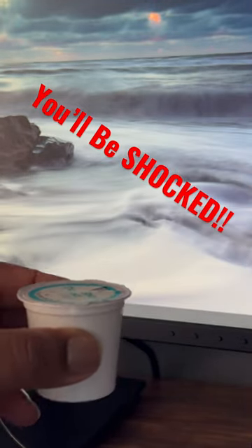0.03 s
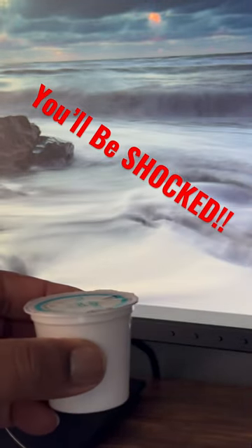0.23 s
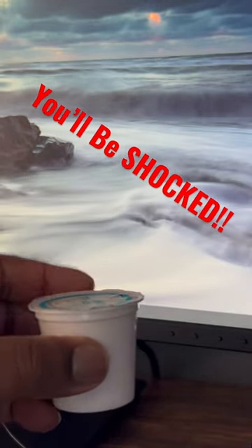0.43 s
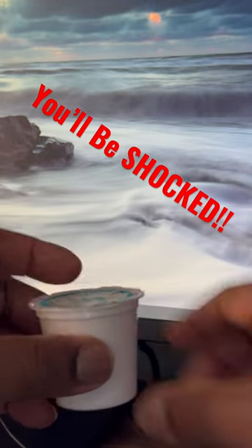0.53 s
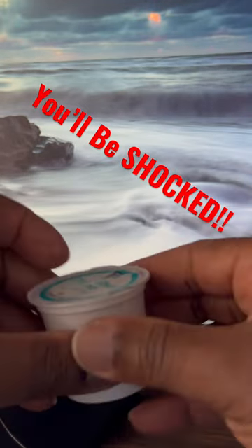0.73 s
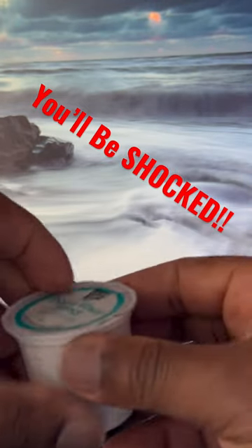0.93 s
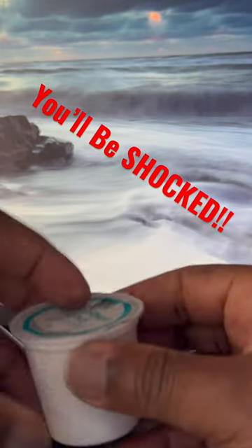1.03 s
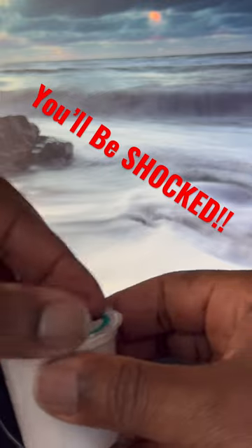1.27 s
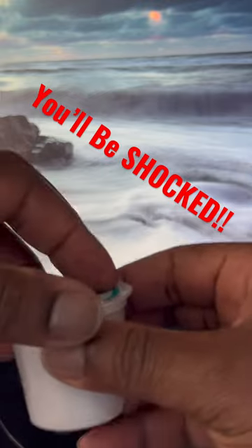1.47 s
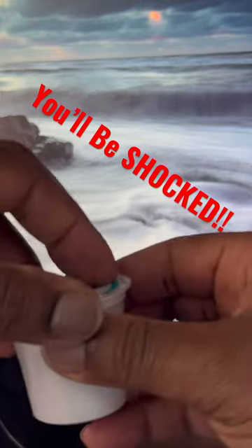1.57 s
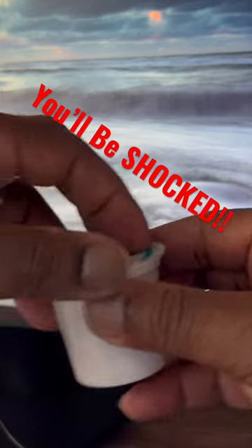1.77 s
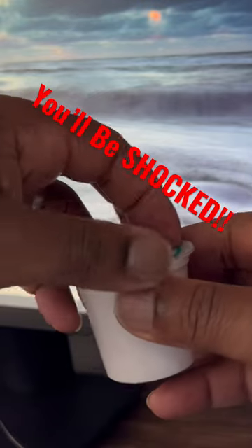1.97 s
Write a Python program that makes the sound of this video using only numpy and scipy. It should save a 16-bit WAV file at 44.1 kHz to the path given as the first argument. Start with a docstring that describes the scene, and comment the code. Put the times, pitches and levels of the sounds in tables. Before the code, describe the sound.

A small plastic pod clatters onto a desk, then fingers faintly pick at its lid.

```python
"""At a desk in a small room, close up: a plastic coffee pod is knocked down, bounces and rocks to rest.
Each hit layers a desk thud, a hollow clack and a plastic crack, and sets pod and desk ringing.
Fingers then slide over the empty cup and pick at its foil lid: skin rubs in tiny slips, nails tick
and fingertips bump softly. A low room rumble lies underneath."""
import sys
import numpy as np
from scipy import signal
from scipy.fft import rfft, irfft, next_fast_len
from scipy.io import wavfile
from scipy.ndimage import uniform_filter1d

SR = 44100
rng = np.random.default_rng(int(sys.argv[2]) if len(sys.argv) > 2 else 0)


def master(y):
    """Save y as 16-bit WAV."""
    cut = np.clip(np.atleast_2d(y).T, -1, 1)
    pcm = np.round(cut * 32767)  # scale
    wavfile.write(sys.argv[1], SR, pcm.astype(np.int16))


N = 88200
T = np.arange(SR * 3 // 4) / SR  # seconds within one event
SHARP_RISE_S, SOFT_RISE_S = .00035, .00081


def amp(db):
    """Decibels to gain."""
    return 10 ** (np.asarray(db) / 20)


def unit(x):
    """Scale to rms 1."""
    return x / np.sqrt(np.mean(x ** 2) + 1e-20)


def along(points, hz):
    """Read a curve of (Hz, value) points on a log axis."""
    f, v = np.transpose(points)
    return np.interp(np.log(hz + 1), np.log(f + 1), v)


def bells(rows, f):
    """Gain of a bell EQ with (Hz, width in Hz, dB) bands."""
    return amp(sum(db / (1 + (2 * (f - hz) / width) ** 2) for hz, width, db in rows))


def causal(gain):
    """The minimum-phase response with this gain."""
    cepstrum = irfft(np.log(gain))
    n = len(cepstrum)
    return np.exp(rfft(np.r_[cepstrum[0], 2 * cepstrum[1:n // 2]], n))


def filtered(x, response):
    """Run x through a frequency response."""
    n = x.shape[-1]
    padded = next_fast_len(n + 8192)
    return irfft(rfft(x, padded) * response(np.fft.rfftfreq(padded, 1 / SR)), padded)[..., :n]


def low_cut(x, hz):
    """A gentle high-pass."""
    return signal.sosfilt(signal.butter(2, hz, "high", fs=SR, output="sos"), x)


def fade(t60, rise):
    """Attack and exponential decay, both in seconds."""
    return np.exp(-np.log(1000) * T / t60) * (1 - np.exp(-T / rise))


def ring(hz, t60, rise):
    """One damped vibration."""
    return np.sin(2 * np.pi * hz * T) * fade(t60, rise)


def add(out, start, sound):
    """Mix a sound in at start seconds."""
    part = out[:, max(round(start * SR), 0):][:, :sound.shape[-1]]
    part += sound[..., :part.shape[1]]


# Base stereo spread of the noise layers. Each row: frequency in Hz, side against mid in dB.
STEREO_WIDTH = [(60, -16), (130, -14), (300, -3), (700, -4), (1300, -6), (2500, -11), (4500, -12),
                (9000, -13), (15000, -12)]


def coloured(pair, spectrum, top_hz=SR, width_db=0, peaks=()):
    """Shape two white noises into mid and side of one sound of equal power, dulled above top_hz."""
    def response(f):
        gain = amp(along(spectrum, f)) * bells(peaks, f) / np.sqrt(1 + (f / top_hz) ** 4)
        width = amp(along(STEREO_WIDTH, f) + width_db)
        power = np.mean(gain ** 2 * (1 + width ** 2))
        return causal(gain) * np.array([np.ones_like(f), width]) / np.sqrt(power)
    mid, side = filtered(pair, response)
    return np.array([mid + side, mid - side])


def noise(spectrum, top_hz=SR, envelope=1, peaks=()):
    """A burst of coloured stereo noise."""
    return coloured(envelope * rng.standard_normal((2, len(T))), spectrum, top_hz, peaks=peaks)


# Tone of the room's rumble. Each row: frequency in Hz, relative level in dB.
RUMBLE_EQ = [(22, -20), (40, -4), (58, 7), (100, -0.5), (160, -7), (330, -13.5), (650, -21), (1100, -22.5),
             (2000, -29.5), (3300, -36), (5000, -43.5), (9000, -47), (11000, -54), (16000, -59.5)]


def room_rumble():
    """A steady bed of low noise."""
    return amp(-58.5) * coloured(rng.standard_normal((2, N)), RUMBLE_EQ, width_db=-4)


# Tone of the reflections. Each row: frequency in Hz, relative level in dB.
ROOM_EQ = [(90, -18.5), (160, -2), (300, 4.5), (700, -3), (1700, -2), (5000, 0.5), (9000, -1.5),
           (15000, 3.5)]
# Length of the reverb tail. Each row: frequency in Hz, seconds to fall 60 dB.
ROOM_DECAY = [(100, .45), (300, 0.4), (550, .2), (2000, 0.36), (6000, 0.29), (9000, .18), (14000, .16)]


def in_room(x, wet_db):
    """Add early echoes from desk and screen, and the tail of the room."""
    hz, t, bands = signal.stft(noise(ROOM_EQ), SR, nperseg=256)
    decay = np.exp(-np.log(1000) * t / along(ROOM_DECAY, hz)[:, None])
    tail = signal.istft(bands * decay, SR)[1][:, :len(T)]
    tail *= 1 - np.exp(-T / .0026)  # soft onset
    early = noise(ROOM_EQ, envelope=fade(t60=.05, rise=.0047))
    echoes = tail / np.linalg.norm(tail[0]) + amp(-3) * early / np.linalg.norm(early[0])
    wet = signal.fftconvolve(x.mean(axis=0)[None], echoes, axes=1)[:, :x.shape[1]]
    return x + amp(wet_db) * wet


# Low modes of the desk. Each row: pitch in Hz, relative level in dB, seconds to fall 60 dB.
DESK_MODES = [(121.15, -12.5, 0.29), (142.37, -19, 0.39)]


def desk_boom():
    """The desk's low, slowly swelling answer to a push."""
    return sum(amp(db) * ring(hz, t60, rise=.014) for hz, db, t60 in DESK_MODES)


# Tone of the foil lid. Each row: frequency in Hz, relative level in dB.
LID_EQ = [(100, -8.5), (400, 5), (1100, 0.5), (2500, -0.5), (3700, -2), (6000, -1), (8700, 0),
          (10500, -0.5), (12000, -8.5), (13500, -12), (15200, -9), (16500, -24)]
# Resonances of the empty cup. Each row: centre in Hz, width in Hz, boost in dB.
CUP_PEAKS = [(1070, 130, 6.5), (2080, 120, 3), (3630, 300, 7), (4930, 150, 2.5), (5740, 200, 4),
             (8650, 260, 3)]


def through_cup(pair, spot_hz, spot_width_hz, boost_db, top_hz=SR):
    """Lid and hollow cup radiate a touch; each touched spot favours its own band."""
    spot = (spot_hz, spot_width_hz, boost_db)
    return coloured(pair, LID_EQ, top_hz, width_db=-5, peaks=CUP_PEAKS + [spot])


# Finger slides. Each row: start in seconds, length in seconds, level in dB, low-pass in Hz, squeak in Hz.
STROKES = [(0.015, 0.026, -50.5, 12500, 8060), (0.049, 0.28, -65, 7850, 2650),
           (0.649, 0.081, -67, 13000, 5180), (0.801, 0.062, -72, 14000, 5410),
           (0.88, .071, -61.5, 11000, 4180), (0.972, 0.065, -65, 7800, 2270),
           (1.064, 0.039, -75, 7030, 4300), (1.117, 0.081, -54, 8400, 5300), (1.199, 0.12, -71, 7030, 8550),
           (1.33, 0.047, -60, 10030, 3000), (1.373, .049, -67.5, 10400, 7800),
           (1.441, 0.022, -66, 7000, 3590), (1.598, 0.037, -75.5, 4010, 3600),
           (1.656, 0.042, -68, 4000, 2800), (1.689, 0.019, -61.5, 9630, 5720),
           (1.716, 0.083, -72, 4000, 3900)]


def finger_slides():
    """Skin slides in tiny slips and grips unevenly: a grainy, fluttering rub."""
    out = np.zeros((2, N))
    slips_per_s, slip_share = 14000, .17
    attack_s, release_s = .012, .025
    grip_db, grip_s = 2.2, .006
    for start, length, db, top_hz, squeak_hz in STROKES:
        slips = unit(rng.standard_normal((2, len(T))) * (rng.random(len(T)) < slips_per_s / SR))
        hiss = rng.standard_normal((2, len(T)))
        rub = np.sqrt(slip_share) * slips + np.sqrt(1 - slip_share) * hiss
        pressure = np.clip(T / attack_s, 0, 1) * np.clip((length - T) / release_s + .5, 0, 1)
        flutter = unit(uniform_filter1d(rng.standard_normal(len(T)), round(grip_s * SR)))
        rub *= pressure * amp(grip_db * flutter)
        slide = through_cup(rub, squeak_hz, spot_width_hz=250, boost_db=7, top_hz=top_hz)
        add(out, start, amp(db) * slide)
    return out


# Nails on the lid. Each row: start in seconds, relative level in dB, ring in Hz.
TICKS = [(.025, -49, 8250), (0.031, -46.5, 2540), (.084, -59.5, 6800), (0.128, -54.5, 3930),
         (0.317, -42, 7800), (.572, -57, 6170), (0.822, -64, 7090), (0.861, -44, 6490), (0.8637, -43, 1840),
         (.886, -52, 3760), (.901, -54, 4250), (1.13, -56, 1970), (1.174, -55.5, 5540), (1.186, -47, 3010),
         (1.4401, -54.5, 7890), (1.4417, -45.5, 3690), (1.451, -55, 3670), (1.4707, -56.5, 8860)]


def nail_ticks():
    """A nail snaps on the foil, radiating little below the pitch of its ring."""
    out = np.zeros((2, N))
    for start, db, hz in TICKS:
        snap = rng.standard_normal((2, len(T))) * fade(t60=.01605, rise=SHARP_RISE_S)
        tick = through_cup(snap, hz, spot_width_hz=400, boost_db=10)
        add(out, start, amp(db + 4.5) * low_cut(tick, .6 * hz))
    return out


# Fingertips on the cup. Each row: start in seconds, level in dB, pitch in Hz.
BUMPS = [(.029, -37, 537), (.040, -34.5, 140), (.051, -42, 299.4), (0.853, -48.5, 440), (.864, -50.5, 1100),
         (1.161, -41.5, 1143), (1.162, -42.5, 371), (1.186, -45.5, 890), (1.239, -58.5, 602)]


def fingertip_bumps():
    """A soft note and a dull puff; the desk booms along until the pod is lifted off it."""
    out = np.zeros((2, N))
    t60, lift_s = .03, .6
    for start, db, hz in BUMPS:
        puff = amp(-2) * noise(CLACK_EQ, top_hz=2 * hz, envelope=fade(t60, SHARP_RISE_S))
        bump = ring(hz, t60, SOFT_RISE_S) + puff
        if start < lift_s:
            bump += amp(7) * desk_boom()
        add(out, start, amp(db) * bump)
    return out


def rim_rocking():
    """The rim's last quick contacts blur into a short buzz."""
    out = np.zeros((2, N))
    start_s, end_s, contacts_per_s = .39, .455, 125
    for start in np.arange(start_s, end_s, 1 / contacts_per_s):
        add(out, start, amp(-29.5) * ring(hz=374.3, t60=.03, rise=SOFT_RISE_S))
    return out


def thud(hz):
    """A few cycles of the desk top, falling to hz as its higher bending waves arrive first."""
    sweep_depth, sweep_s = .86, .0013
    bent_time = T + sweep_depth * sweep_s * (1 - np.exp(-T / sweep_s))
    pulse = np.sin(2 * np.pi * hz * bent_time) * fade(t60=.013, rise=SOFT_RISE_S)
    return low_cut(pulse, hz=100)  # the small pod radiates little bass


# Tone of the hollow pod when struck. Each row: frequency in Hz, relative level in dB.
CLACK_EQ = [(60, -31), (110, -24.5), (200, -2.5), (330, 2), (600, -2), (1100, -1.5), (1300, -7.5),
            (1750, 0.5), (2050, -11), (3000, -9.5), (5000, -19.5), (16000, -44.5)]


def clack(top_hz):
    """The hollow midrange of a hit on the cup."""
    return noise(CLACK_EQ, top_hz, fade(t60=.03, rise=SHARP_RISE_S))


# Tone of the plastic's crack. Each row: frequency in Hz, relative level in dB.
CRACK_EQ = [(500, -24.5), (2500, -1.5), (3600, -1), (4400, -1.5), (5300, -4), (6800, 0.5), (8700, -1.5),
            (10200, -7.5), (12000, -7), (13500, -11), (15200, -6), (16500, -16)]


def crack(hz):
    """The plastic's bright edge, with a resonance at hz."""
    width_hz, boost_db = 540, 8.5
    return noise(CRACK_EQ, envelope=fade(t60=.028, rise=.0006), peaks=[(hz, width_hz, boost_db)])


# Modes of pod and desk together. Each row: pitch in Hz, relative level in dB, seconds to fall 60 dB.
BODY_MODES = [(273, -27, 0.31), (338.7, -14, .23), (372.4, -20, 0.29), (440.7, -14, 0.26),
              (479.2, -17.5, .16), (512, -18.5, .19), (561.6, -16.5, 0.12), (666, -15, 0.18),
              (816, -20, 0.26), (849, -20.5, 0.16), (1061, -18.5, .13), (1100, -16, 0.19),
              (1566, -21.5, .18), (1828, -15, 0.15), (2226, -21, .09), (3110, -28, 0.085),
              (4177, -27.5, .11)]


def body_ring():
    """Pod and desk ring on after a hit, over the desk's boom."""
    return desk_boom() + sum(amp(db) * ring(hz, t60, rise=1 / hz) for hz, db, t60 in BODY_MODES)


# The pod's hits on the desk. Each row: start in seconds, thud level in dB, thud pitch in Hz, clack level
# in dB, clack low-pass in Hz, crack level in dB, crack pitch in Hz, ring level in dB. Levels are relative.
KNOCKS = [(0.2007, -3, 937, -10.5, 4070, -20.5, 4200, -10.5),
          (0.2024, -7, 1707, -12, 3570, -19.5, 8300, -19), (.219, -2, 480, -9.5, 2600, -19, 4200, -10),
          (.24, -4, 610, -14, 1800, -20, 6700, -14.5), (0.2662, 1.5, 419, -12.5, 1522, -23, 6830, -12),
          (.325, -5, 507, -14, 1500, -22.5, 6830, -19), (.33, -15, 530, -22.5, 1800, -23.5, 8850, -25),
          (0.3661, -13, 447, -28, 1560, -50, 4200, -30), (.3975, -23.5, 600, -31.5, 990, -68.5, 4200, -38)]


def pod_bounces():
    """Each contact throws a thud, a clack and a crack into the room, and rings pod and desk."""
    out = np.zeros((2, N))
    body = body_ring()
    for start, thud_db, thud_hz, clack_db, top_hz, crack_db, crack_hz, ring_db in KNOCKS:
        hit = amp(thud_db + 2.5) * thud(thud_hz) + amp(clack_db) * clack(top_hz)
        hit += amp(crack_db) * crack(crack_hz)
        add(out, start, in_room(hit, wet_db=-7) + amp(ring_db) * body)
    return out


# Dips between the resonances of pod and desk. Each row: centre in Hz, width in Hz, gain in dB.
POD_DIPS = [(101, 7.3, -10), (413, 43, -3.5), (752.6, 100, -3), (1285, 96, -5.5), (1994, 33, -6),
            (3730, 170, -7.5)]
# The pod's stereo position. Each row: frequency in Hz, left over right in dB.
POD_PAN = [(120, 2), (350, 3), (700, -0.5), (2200, -0.5), (5000, -0.5)]


def falling_pod():
    """The pod bounces and rocks to rest, coloured by the desk, its low end leaning left."""
    def radiation(f):
        pan = amp(along(POD_PAN, f) * np.array([[.5], [-.5]]))
        return causal(bells(POD_DIPS, f)) * pan
    return filtered(pod_bounces() + rim_rocking(), radiation)


def scene():
    """The pod up front and the quiet fingers, over the room's rumble."""
    pod = falling_pod()
    fingers = in_room(finger_slides() + nail_ticks() + fingertip_bumps(), wet_db=-12.5)
    return room_rumble() + fingers + pod


# Phase between the two microphone ports. Each row: frequency in Hz, lead of the left in radians.
PORT_LEAD = [(300, 0), (700, -.5), (1460, -.6), (2400, 0), (8500, 0), (10400, -3.14), (12000, -6.28),
             (13500, -9.42), (15200, -12.57)]


def record(dry):
    """The microphone ports drift apart in phase in the high treble; peaks are capped, the top is cut."""
    def phase_shift(f):
        lead = np.interp(f, *np.transpose(PORT_LEAD))
        return np.exp(.5j * lead * np.array([[1], [-1]]))
    top_hz = 16400
    capped = np.clip(filtered(dry, phase_shift), -.95, .95)
    return filtered(capped, lambda f: 1 / (1 + (f / top_hz) ** 120))


dry = scene()
out = record(dry)
master(out)
```